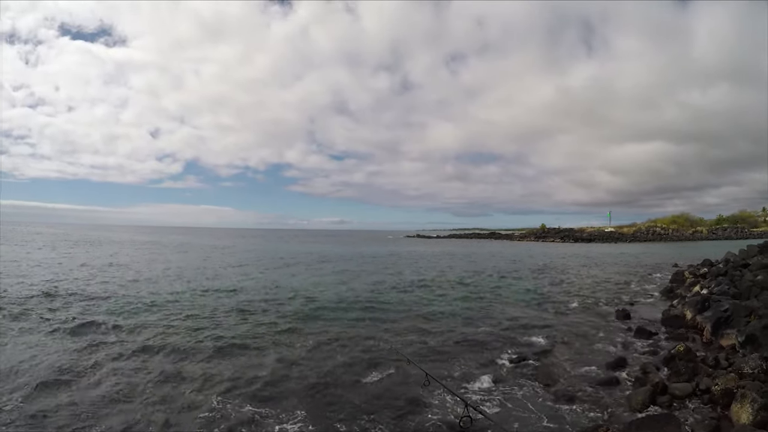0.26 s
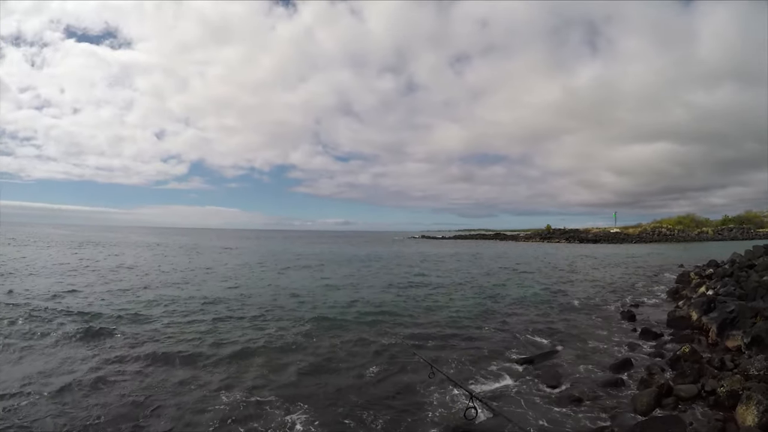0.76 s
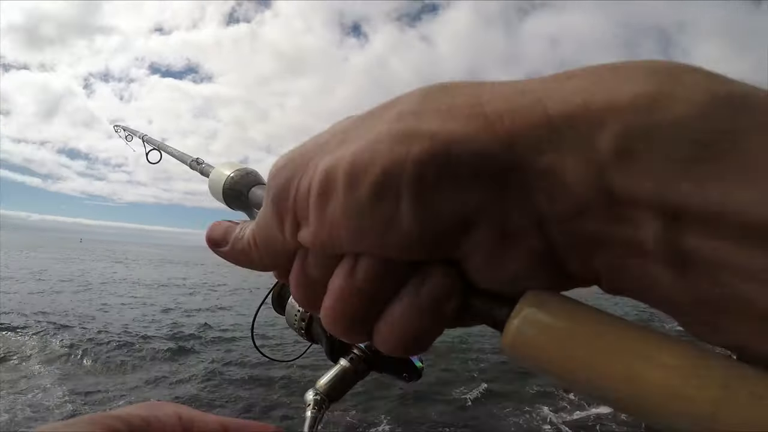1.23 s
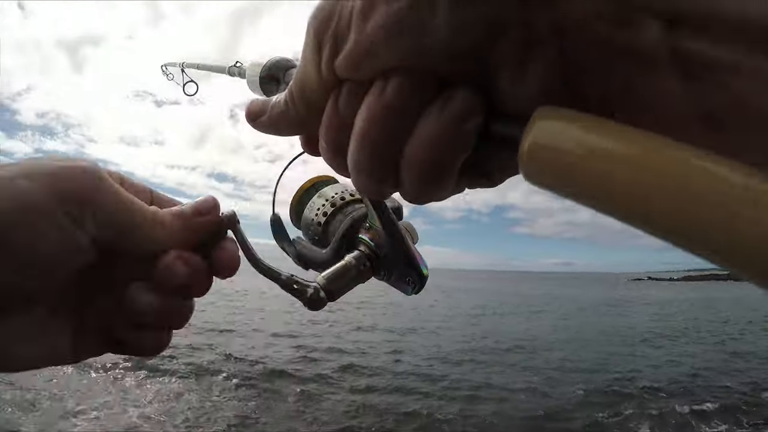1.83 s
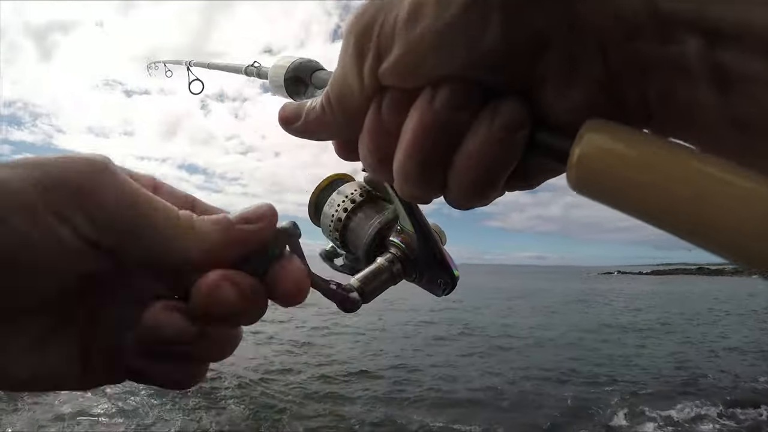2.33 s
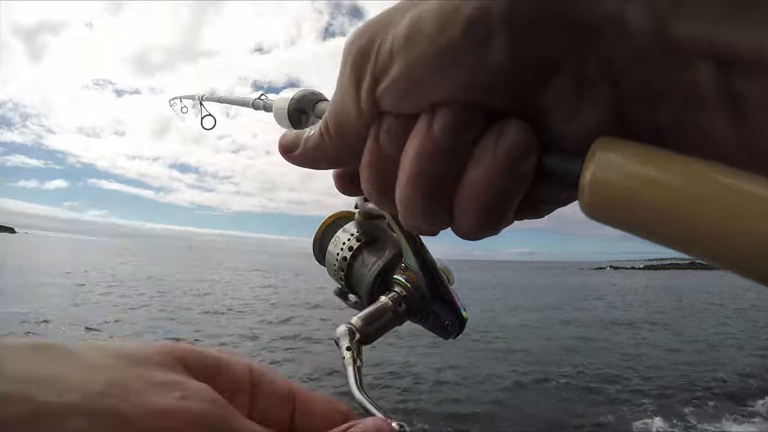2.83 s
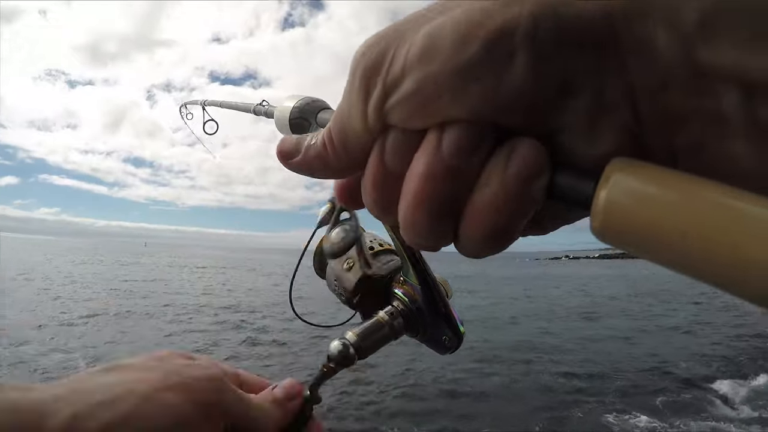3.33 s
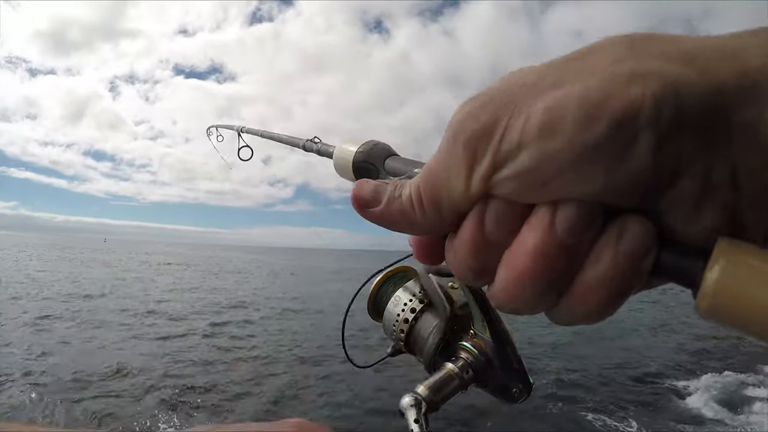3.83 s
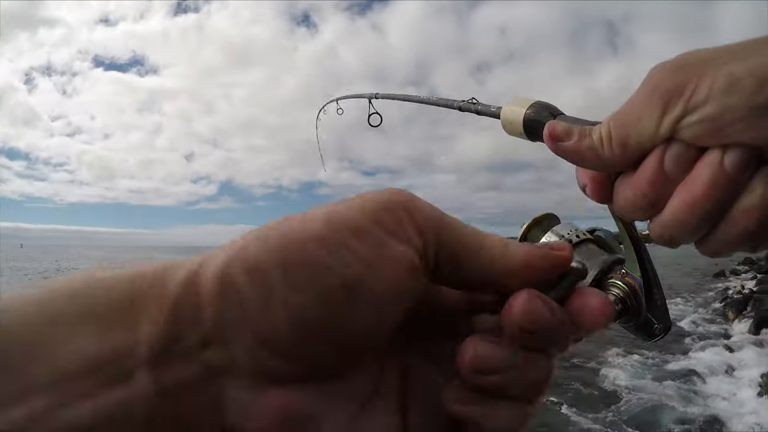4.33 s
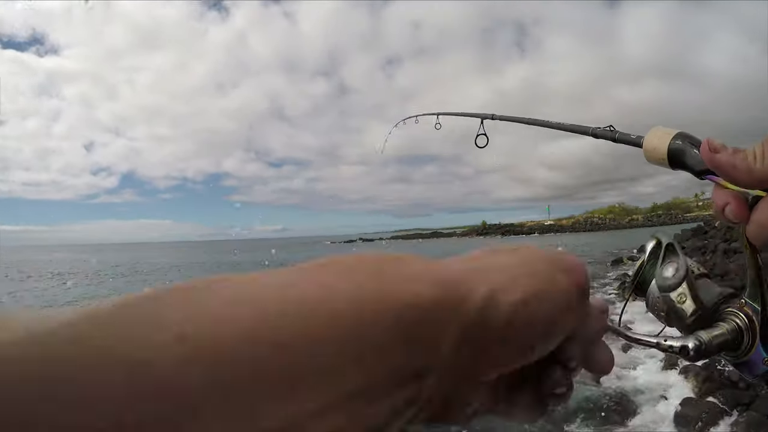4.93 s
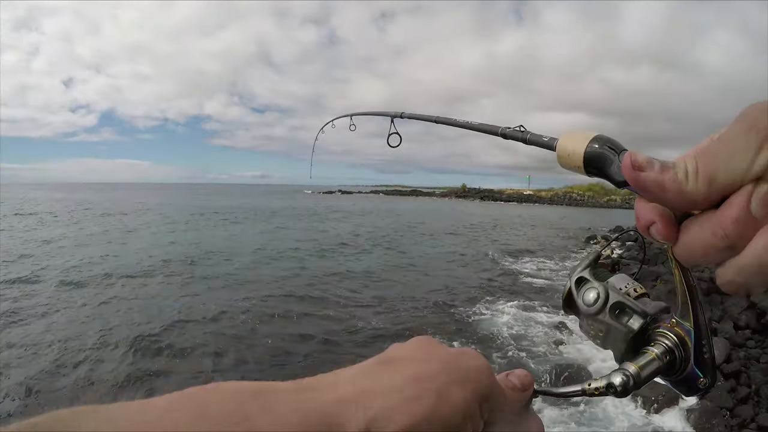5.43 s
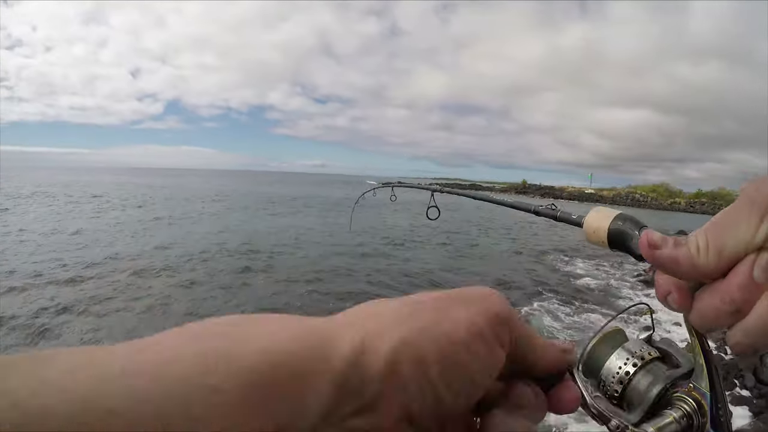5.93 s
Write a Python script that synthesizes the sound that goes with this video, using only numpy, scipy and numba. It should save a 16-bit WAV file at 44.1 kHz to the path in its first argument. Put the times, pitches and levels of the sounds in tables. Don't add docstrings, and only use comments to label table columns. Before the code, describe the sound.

Low, irregular wind buffets hit a microphone in a closed housing beside the sea. Water washes softly, then swells past the middle into a broad, hissing break on the rocks before easing. Early on, thin high squeaks and rough chatter come from fishing line under tension; tiny reel clicks appear sparsely, most densely in the last second.

```python
import sys
import numpy as np
from scipy import signal
from scipy.fft import rfft, irfft
from scipy.io import wavfile
from scipy.ndimage import uniform_filter1d
from numba import njit

SR = 44100
rng = np.random.default_rng(int(sys.argv[2]) if len(sys.argv) > 2 else 0)


def wav_out(sig):
    wavfile.write(sys.argv[1], SR, np.round(np.clip(np.atleast_2d(sig).T, -1, 1) * 32767).astype(np.int16))


def nominal_scale(level):
    x = np.asarray(level, float) / 20
    return 10 ** x


N = 271643
T = np.arange(N) / SR


def level(x, db):
    return x * nominal_scale(db) / np.sqrt(np.mean(x ** 2))


def curve(table):
    t, *columns = np.transpose(table)
    return [np.interp(T, t, column) for column in columns]


def colour(x, points):
    hz, db = np.transpose(points)
    size = 8192
    log_hz = np.log(np.fft.rfftfreq(size, 1 / SR) + 1)
    log_gain = np.interp(log_hz, np.log(hz), db) * np.log(10) / 20
    cepstrum = irfft(log_gain)
    cepstrum[1:size // 2] *= 2
    cepstrum[size // 2 + 1:] = 0
    impulse_response = irfft(np.exp(rfft(cepstrum)))
    return signal.fftconvolve(x, impulse_response)[:N]


def bands(x, centre_hz, octaves):
    place = np.log2(np.fft.rfftfreq(N, 1 / SR) / centre_hz + 1e-9) / octaves
    return irfft(rfft(x) * np.cos(np.pi / 2 * np.clip(place, -1, 1)), N)


def walk(rate_hz):
    hold = int(SR / rate_hz)
    steps = np.repeat(rng.standard_normal(N // hold + 1), hold)
    return 1.3 * uniform_filter1d(uniform_filter1d(steps, hold), hold)[:N]


def even(x, span_s, share):
    power = uniform_filter1d(x ** 2, int(span_s * SR))
    return level(x / power ** (share / 2), 0)


@njit
def grains(start, hz, cycles, size, glide, length):
    out = np.zeros(length)
    for k in range(len(start)):
        span = cycles[k] * SR / hz[k]
        for i in range(min(int(4 * span), length - start[k])):
            phase = 2 * np.pi * hz[k] * i / SR * (1 + glide * i / span)
            out[start[k] + i] += size[k] * np.exp(-i / span) * np.sin(phase)
    return out


def foam(low_hz, high_hz, cycles, scatter_db, count):
    when, pitch, strength, damping = rng.random((count, 4)).T
    start = (when * N).astype(np.int64)
    hz = low_hz * (high_hz / low_hz) ** pitch
    size = nominal_scale(-scatter_db * np.log(1.008 - strength)) * hz
    return level(grains(start, hz, cycles * (.5 + damping), size, 0.067, N), 0)


# t/s, swell level below the crest/dB
SWELL = [(0.0, -17), (0.5, -15), (1.0, -14), (1.3, -12), (1.75, -10.5), (2.1, -10), (2.5, -11), (2.8, -8),
         (3.15, -6.5), (3.4, -1), (3.6, -2), (3.8, -0.5), (4.2, -1), (4.6, -3.5), (5.0, -4), (5.4, -8.5),
         (5.7, -8.5), (6.16, -10.5)]
# f/Hz, density level/dB per Hz
WATER_SPECTRUM = [(90, -7.5), (200, -1.5), (400, 0), (680, 2), (850, -4.5), (1100, -15), (1400, -23.5),
                  (1750, -28.5)]
# f/Hz, gain/dB
HOUSING_RESPONSE = [(1800, -2.5), (2200, 4.5), (2600, 11), (3100, 7), (3600, -1.5), (4800, 3), (5700, 0),
                    (6800, -3.5), (7250, -8.5), (8200, -9), (9300, -12.5), (11800, -13), (13200, -9.5),
                    (15200, -13.5)]
# f/Hz, share/1, foam level/dB
SWELL_RESPONSE = [
    (150, 1.12, 0),
    (350, 0.95, -0.35),
    (750, 1.11, 0.73),
    (1310, 0.8, -2.3),
    (2500, 0.53, 4.5),
    (5000, 0.73, 3.5),
    (8000, 0.62, 7.5),
    (13000, 0.88, 5),
]
# t/s, length/s, f/Hz, lift level/dB
SLAPS = [(.3, .2, 5000, 2), (1.213, 0.28, 5000, 3), (1.38, 0.093, 330, 6.5), (3.42, 0.033, 2700, 1.5),
         (3.87, 0.099, 4000, 2.5), (4.346, 0.076, 2700, 3), (4.615, 0.14, 5200, 4.5),
         (4.86, 0.11, 2700, 3.5), (5.003, 0.088, 5000, 1.5), (5.65, 0.21, 716, 2), (1.7, 0.27, 1270, 1),
         (3.13, .05, 130, 0), (3.75, 0.18, 1030, 2.2), (4.27, 0.18, 150, 6), (4.3, 0.099, 1150, 1),
         (1.05, 0.061, 520, 3), (5.25, 0.22, 2800, 2.5), (5.6, .3, 5000, 3)]


def surf():
    crest_db, slap_octaves = -18.5, .8
    swell_db, = curve(SWELL)

    break_s, rise_s, hold_s, drain_per_s = 3.04, 0.29, 1.85, 0.45
    rising = (T - break_s) / rise_s
    draining = 1 - drain_per_s * (T - break_s - rise_s - hold_s)
    white = np.clip(np.minimum(rising, draining), 0, 1)

    rush = rng.standard_normal(N)
    gurgle = nominal_scale(-15) * foam(300.8, 3490, 5.8, 4.4, count=6000)
    fizz = nominal_scale(-6.5) * foam(6600, 16500, 4.5, 2.7, count=9000)
    water = colour(colour(rush + gurgle + fizz, WATER_SPECTRUM), HOUSING_RESPONSE)

    slap_t, length, slap_hz, lift_db = np.transpose(SLAPS)
    slaps = lift_db[:, None] * np.exp(-((T - slap_t[:, None]) / length[:, None]) ** 2)
    slosh = walk(30)
    ranges_hz, shares, foams_db = np.transpose(SWELL_RESPONSE)
    out = 0
    for hz in 88 * 2 ** np.arange(0, 8, .5):
        share = np.interp(np.log(hz), np.log(ranges_hz), shares)
        foam_db = np.interp(np.log(hz), np.log(ranges_hz), foams_db)
        slaps_db = np.exp(-(np.log2(hz / slap_hz) / slap_octaves) ** 2) @ slaps
        patchy = np.clip(np.log2(hz / 500) / 4, .2, 1)
        flicker_db = patchy * (0.68 * slosh + 0.93 * walk(45))
        band_db = share * swell_db + foam_db * (white - 1) + slaps_db + flicker_db
        out = out + bands(water, hz, 0.62) * nominal_scale(band_db)
    return out * nominal_scale(crest_db) / np.std(bands(water, 560, 2.37))


# t/s, level/dB
WIND_STRENGTH = [(0.0, -18), (0.7, -22.5), (1.1, -16), (1.5, -18), (2.2, -23.5), (3.1, -23), (3.7, -16.5),
                 (4.3, -20), (4.7, -22), (5.1, -26), (5.7, -27.5), (6.16, -29)]
# f/Hz, density level/dB per Hz
EDDY_SPECTRUM = [(12, -14), (22, -2), (36, -1.5), (60, -4), (100, -9.5), (170, -16.5), (300, -27.5),
                 (600, -71.5)]
# t/s, length/s, buffet level/dB, flutter level/dB
PORT_GUSTS = [(0.096, 0.035, -27.5, -21), (0.256, 0.036, -9.5, -28), (0.444, 0.021, -11.5, -32),
              (0.523, 0.042, -12.5, -22), (0.655, 0.022, -15, -23), (.77, 0.054, -13, -24),
              (0.838, 0.014, -8.5, -33), (0.97, 0.056, -17, -22.5), (1.09, 0.025, -17, -22.5),
              (1.35, 0.018, -11, -19.5), (1.54, 0.036, -15.5, -24.5), (1.684, 0.026, -13, -29),
              (1.917, 0.055, -14, -24), (2.073, .025, -12.5, -28), (2.322, .03, -16, -38),
              (2.476, 0.067, -13, -18), (2.642, .04, -18, -29), (2.817, 0.046, -14.5, -21.5),
              (3.015, 0.036, -14, -19), (3.357, 0.17, -20, -23), (3.513, .03, -13, -36),
              (3.657, .03, -26, -22), (3.863, 0.044, -15, -22), (4.09, 0.025, -11, -21.5),
              (4.177, 0.098, -19, -17.5), (4.428, 0.037, -15.5, -15), (4.595, 0.11, -17, -22.5),
              (4.892, 0.046, -30, -20.5), (5.44, 0.05, -23.5, -43), (6.16, 0.023, -14, -39)]
# t/s, peak level/dB, f/Hz, length/cycles
LONE_EDDIES = [(0.207, -13, 36.7, 0.5), (0.415, 0, 65.6, 2.6), (0.628, 3, 37.7, 2.2),
               (0.919, -2.5, 29.6, 3.4), (1.312, -22, 41, 0.91), (1.648, -15.5, 51.1, 0.87),
               (1.883, -10, 27.4, 1.1), (2.045, -3, 26.9, 1.2), (2.271, -13, 35.0, 1.7),
               (2.439, -8, 27.1, 3.1), (2.61, 1, 35.5, 1.6), (2.786, 0, 29.8, 1.5),
               (2.983, 4.5, 42.7, 1.84), (3.17, -2, 41.5, 1.3), (3.327, -14, 43.1, 2.1),
               (3.477, -18, 72.7, 1.5), (3.625, 0.5, 73.5, 1.9), (3.745, -1, 43.1, 1.2),
               (4.055, -4, 32.3, 1.3), (5.325, -31, 32.6, 1.6)]


def wind():
    wind_db, = curve(WIND_STRENGTH)
    buffet_power = nominal_scale(wind_db) ** 2
    flutter_power = nominal_scale(0.51 * wind_db - 15) ** 2
    for t, length, buffet_db, flutter_db in PORT_GUSTS:
        gust = np.exp(-((T - t) / length) ** 2)
        buffet_power = buffet_power + nominal_scale(buffet_db) ** 2 * gust
        flutter_power = flutter_power + nominal_scale(flutter_db) ** 2 * gust

    air = colour(rng.standard_normal(N), EDDY_SPECTRUM)
    slow = signal.sosfilt(signal.butter(3, 60, fs=SR, output="sos"), air)
    quick = signal.sosfilt(signal.butter(3, 60, "high", fs=SR, output="sos"), air)
    buffet = even(slow, 0.043, 0.8) * np.sqrt(buffet_power) * nominal_scale(-1.0)
    flutter = even(quick, 0.041, 0.16) * np.sqrt(flutter_power) * nominal_scale(0.07)
    out = buffet + flutter

    for t, db, hz, cycles in LONE_EDDIES:
        along = (T - t) * hz / cycles
        near = (along > 0) & (along < 1)
        along = along[near]
        out[near] -= nominal_scale(db - 7.5) * np.sin(np.pi * along) ** 2 * np.sin(2 * np.pi * cycles * along)
    return out


OVERTONES = (-16, -32)


def stick_slip(hz):
    phase = 2 * np.pi * np.cumsum(hz) / SR
    out = np.sin(phase)
    for k, db in enumerate(OVERTONES):
        out = out + nominal_scale(db) * np.sin((k + 2) * phase)
    return out


# t/s, chatter f/Hz, chatter level/dB, hiss level/dB
LINE_RUN = [
    (1.05, 2400, -68, -80),
    (1.3, 2400, -38.5, -54),
    (1.5, 2350, -42, -53.5),
    (1.7, 2410, -47, -51),
    (2.0, 2370, -45, -52),
    (2.25, 2420, -50, -57),
    (2.6, 2450, -67.5, -54),
    (3.0, 2380, -70, -53),
    (3.4, 2500, -75, -68),
]
# t/s, length/s, first f/Hz, last f/Hz, level/dB
LINE_SQUEAKS = [(1.054, .012, 3000, 3400, -40), (1.27, .025, 4400, 4600, -46),
                (1.472, .022, 4300, 3850, -41), (1.47, .025, 2250, 2400, -37),
                (1.572, .012, 2350, 2450, -35), (1.622, .009, 2300, 2550, -27),
                (1.631, .016, 2450, 2400, -28), (1.651, .019, 2300, 2800, -27),
                (1.678, .021, 2680, 2280, -25), (1.698, .016, 2450, 2780, -25),
                (1.714, .020, 2520, 2260, -26), (1.746, .016, 2180, 2320, -37),
                (1.772, .006, 2150, 2300, -35), (2.225, .018, 2300, 2500, -36)]


def line():
    chatter_hz, chatter_db, hiss_db = curve(LINE_RUN)
    out = stick_slip(chatter_hz * (1 + 0.075 * walk(260))) * nominal_scale(chatter_db + 4.0 * walk(300))
    hiss = level(bands(rng.standard_normal(N), 7670, 0.33), 0)
    out += hiss * nominal_scale(hiss_db + 1.4 * walk(25.2))

    rough = nominal_scale(2.2 * walk(450))
    waver = 1 + .02 * walk(350)
    for t, length, first_hz, last_hz, db in LINE_SQUEAKS:
        near = (T > t) & (T < t + length)
        along = (T[near] - t) / length
        glide_hz = (first_hz + (last_hz - first_hz) * along) * waver[near]
        envelope = nominal_scale(db) * np.sin(np.pi * along) ** .35 * rough[near]
        out[near] += envelope * stick_slip(glide_hz)
    return out


# t/s, ring peak level/dB, ring f/Hz, snap peak level/dB
REEL_TICKS = [(0.3194, -37, 3940, -52), (0.5094, -38, 3540, -51), (1.0194, -29, 4210, -55),
              (1.2471, -23, 4480, -50), (1.3094, -31, 2900, -39), (2.1944, -36, 4620, -45),
              (2.2294, -35, 4590, -45), (2.6095, -30, 4140, -44), (2.6294, -35, 4680, -44),
              (4.1465, -20, 4790, -40), (4.5196, -21, 5240, -36), (5.1018, -21, 4610, -43),
              (5.2374, -27, 4730, -39), (5.3294, -30, 5710, -45), (5.6196, -22, 4000, -46),
              (5.6685, -19, 4820, -38), (5.7184, -25, 5600, -40), (5.7344, -20, 5150, -43),
              (5.7693, -20, 5210, -40), (5.8024, -26, 5470, -37), (5.9718, -25, 5280, -46)]


def ticks():
    t, ring_db, hz, snap_db = np.transpose(REEL_TICKS)
    start = (t * SR).astype(np.int64)
    ring = grains(start, hz, hz * .0007, nominal_scale(ring_db + 3.5), 0., N)
    impacts = np.zeros(N)
    impacts[start] = nominal_scale(snap_db + 15)
    decay = np.exp(-np.arange(60) / 11.)
    snap = signal.lfilter(decay, 1, impacts) * rng.standard_normal(N)
    return ring + signal.sosfilt(signal.butter(2, 6500, "high", fs=SR, output="sos"), snap)


def scene():
    return (surf() + wind() + line() + ticks())[None]


def band_limit(x):
    return signal.sosfilt(signal.butter(12, 15280, fs=SR, output="sos"), x)


def record(dry):
    rounded = .95 * np.tanh(dry / .95)
    mix = signal.sosfilt(signal.ellip(10, .3, 60, 15250, fs=SR, output="sos"), rounded)
    return band_limit(mix)


dry = scene()
out = record(dry)
wav_out(out)
```